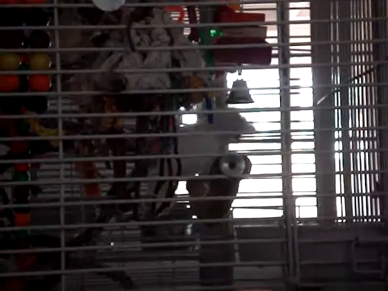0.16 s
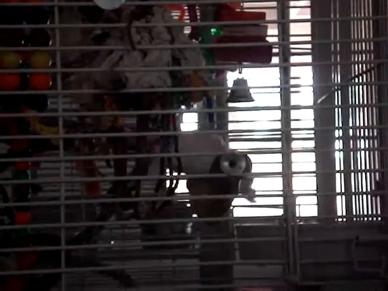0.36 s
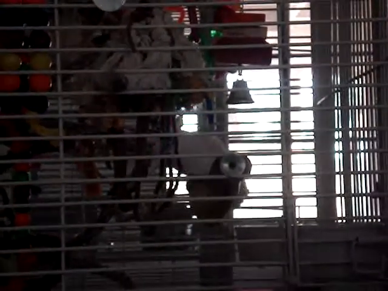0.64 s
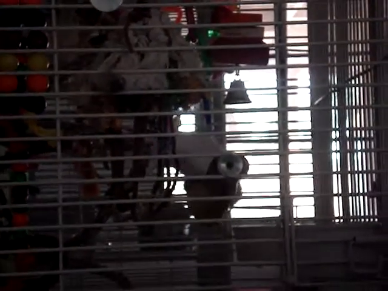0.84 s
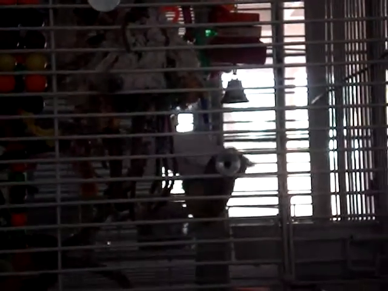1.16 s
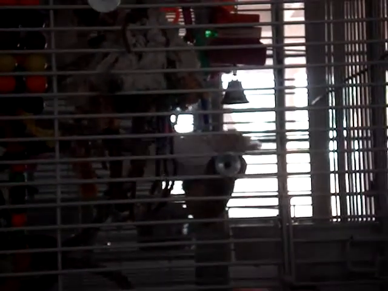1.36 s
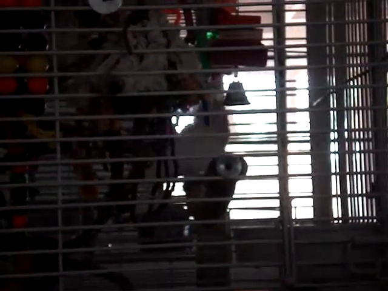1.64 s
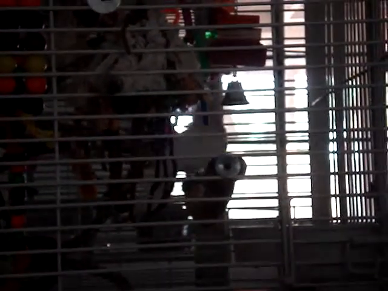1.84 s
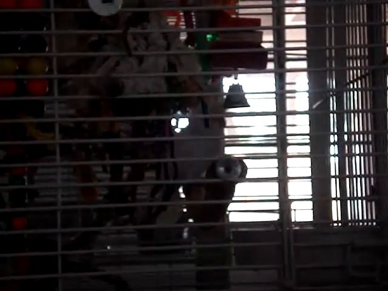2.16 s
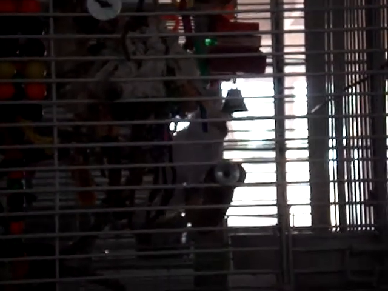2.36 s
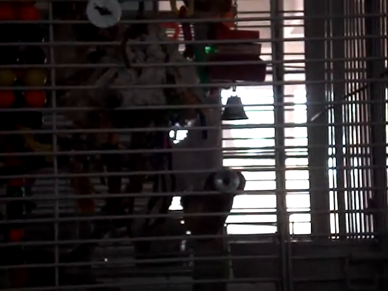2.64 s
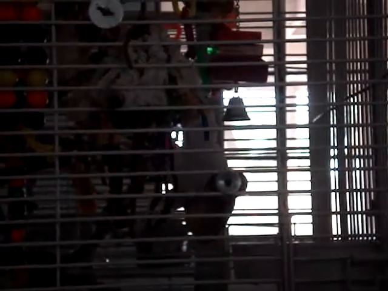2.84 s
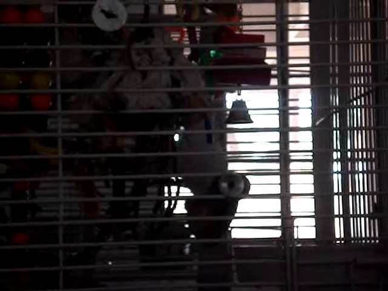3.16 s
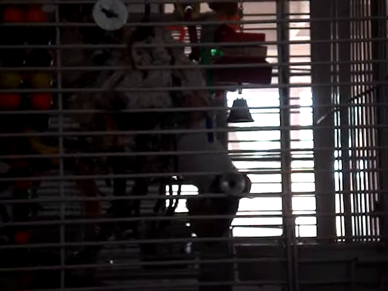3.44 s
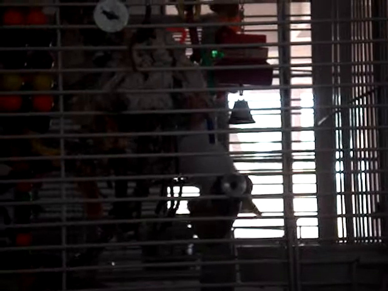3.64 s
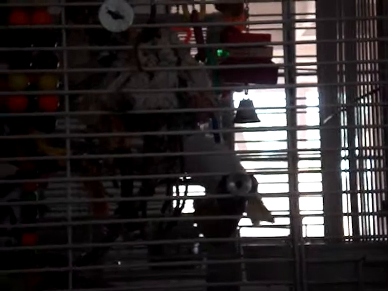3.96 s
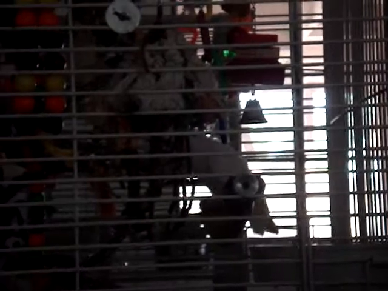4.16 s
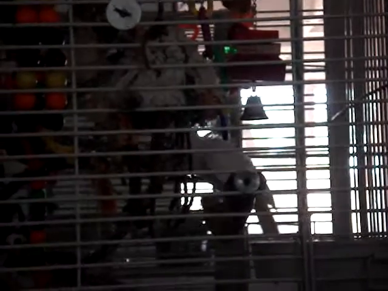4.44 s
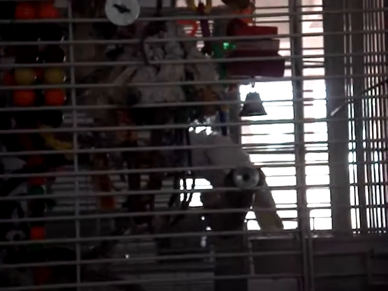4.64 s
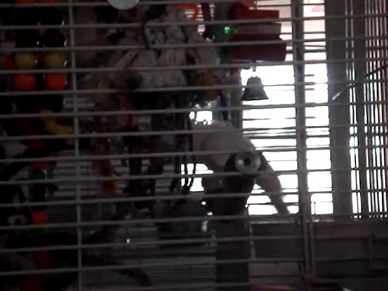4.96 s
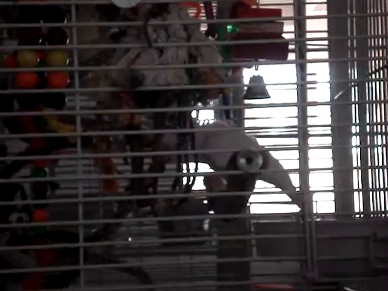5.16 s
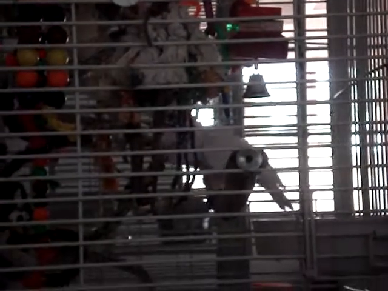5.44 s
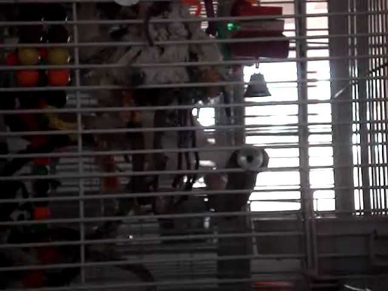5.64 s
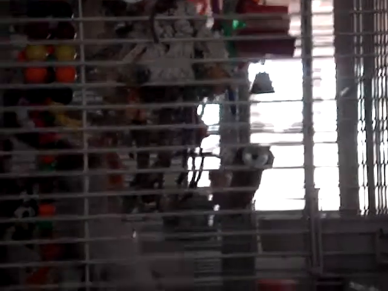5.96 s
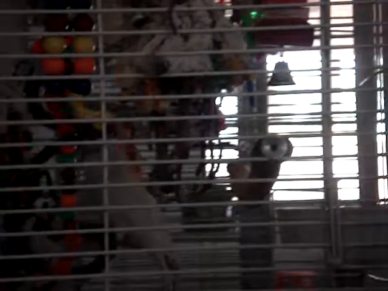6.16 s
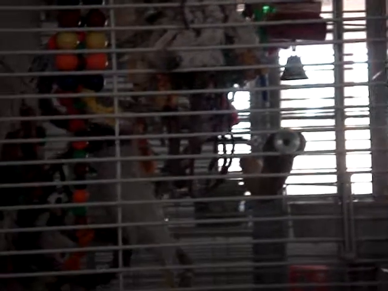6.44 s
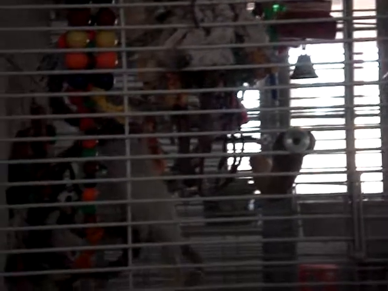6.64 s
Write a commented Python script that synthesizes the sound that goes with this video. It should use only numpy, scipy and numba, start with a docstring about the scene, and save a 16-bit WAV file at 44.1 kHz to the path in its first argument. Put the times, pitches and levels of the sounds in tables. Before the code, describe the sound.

Rasping parrot squawks run into piercing screeches, spaced apart, with a brief feather rustle on cage bars and a steady fan behind.

```python
"""Cockatoo squawking in its cage

Four harsh bouts ring through a hard-walled room: the syrinx flaps in rasping syllables, then pulls
tight into a piercing screech, both shaped by windpipe and beak. Before the last bout the bird moves,
feathers brush the bars and the wires ring faintly. A fan hums behind; a limiter ducks it at loud calls."""
import sys
import numpy as np
from scipy import signal
from scipy.fft import rfft, irfft
from scipy.io import wavfile
from scipy.ndimage import uniform_filter1d
from numba import njit

SR = 44100
rng = np.random.default_rng(int(sys.argv[2]) if len(sys.argv) > 2 else 0)


def unload_audio(sound):
    """Save the sound as a 16-bit wav file, at the path given as the first command line argument."""
    columns = np.transpose(np.atleast_2d(sound))
    # keep every value between -1 and 1, then stretch to whole-number steps
    steps = np.round(np.clip(columns, -1, 1) * 32767)
    wavfile.write(sys.argv[1], SR, steps.astype(np.int16))


N = 300310
TIME = np.arange(N) / SR
FREQS = np.fft.rfftfreq(N, 1 / SR)


def gain_of(db):
    """Decibels to a factor."""
    return 10 ** (np.asarray(db) / 20)


def unit_rms(x):
    """Scales to rms 1."""
    return x / np.sqrt(np.mean(x ** 2) + 1e-20)


def steadied(x):
    """Holds the short-time level at rms 1."""
    return x / np.sqrt(abs(uniform_filter1d(x ** 2, size=1000)) + 1e-12)


def curve_at(points, hz):
    """Reads a table on a log-frequency axis."""
    point_hz, value = np.transpose(points)
    return np.interp(np.log(hz + 1), np.log(point_hz + 1), value)


def noise(colour):
    """Steady noise of a given colour, rms 1."""
    return unit_rms(irfft(rfft(rng.standard_normal(N)) * gain_of(curve_at(colour, FREQS)), N))


def wander(rate_hz):
    """Smooth random modulation up to a rate, rms 1."""
    return unit_rms(irfft(rfft(rng.standard_normal(N)) / (1 + (FREQS / rate_hz) ** 4), N))


def sine(hz):
    """A sine of peak 1 that follows a pitch curve."""
    return np.sin(2 * np.pi * np.cumsum(hz) / SR)


def cut(x, hz, kind, order):
    """High-pass or low-pass."""
    return signal.sosfilt(signal.butter(order, hz, kind, fs=SR, output="sos"), x)


@njit
def resonate(x, hz, width_hz):
    """A moving resonance of gain 1."""
    pole = np.exp(np.pi * (2j * hz - width_hz) / SR)
    feed = 1 - np.exp(-np.pi * width_hz / SR)
    out, state = np.zeros(len(x)), 0j
    for i in range(len(x)):
        state = pole[i] * state + feed[i] * x[i]
        out[i] = 2 * state.real
    return out


# colour of the fan's rush and the room air: (frequency [Hz], relative density [dB])
AIR_COLOUR = [(15, -46.5), (25, -11), (81, -21.5), (124, -14.5), (172, -16.5), (226, -9), (283, -12),
              (492, -3), (601, -6), (681, -3), (1150, -9), (2210, -13), (2830, -18), (7720, -29.5),
              (9910, -34), (12900, -65), (21800, -120)]
# the fan's hum: (frequency [Hz], level [dB])
FAN_HUM = [(120, -64), (145, -68.5), (226.5, -60.5), (327, -70.5), (375, -61.5), (487, -56), (686, -49.5)]


def fan(air_db=-41.5, waver_db=.5, drift=.002):
    """The background bed: rushing air with a few slightly wavering tones."""
    hum = sum(gain_of(db + waver_db * wander(3.8)) * sine(hz * (1 + drift * wander(6)))
              for hz, db in FAN_HUM)
    return cut(gain_of(air_db) * noise(AIR_COLOUR) + np.sqrt(2) * hum, 37, "high", order=2)


def rasp(flap_hz=240, jitter=.35, puff_turns=.6, leak=.72, flutter_db=1.54):
    """The syrinx flaps unevenly and lets through a puff of turbulent air each time."""
    turns = np.cumsum(flap_hz * np.exp(jitter * wander(150))) / SR
    opening = leak + np.exp(-(turns % 1) / puff_turns)
    return unit_rms(opening * gain_of(flutter_db * wander(120)) * rng.standard_normal(N))


# short rasps; "beak" is the first resonance, which rises as the beak opens:
# (start [s], end [s], start effort [dB], end effort [dB], start beak [Hz], end beak [Hz], squeeze [0-1],
# slackness [around 1], brightness [dB], third resonance [Hz], fourth resonance [Hz])
SYLLABLES = [(0, .07, -13.5, -25.5, 1430, 1440, 0.02, 1.02, -2, 3580, 5900),
             (.13, 0.226, -34.5, -25, 1680, 1700, 0.03, 0.82, 3, 3820, 5970),
             (.255, 0.33, -21.5, -16.5, 1651, 1601, .2, 1.15, 0, 4350, 6500),
             (0.362, 0.42, -29.5, -25, 1420, 1450, 0.23, 0.94, -9, 3350, 6400),
             (.44, 0.493, -13, -18.5, 1480, 1440, 0, 0.92, 0.5, 3500, 5680),
             (.51, .56, -23.5, -24, 1460, 1450, 0.06, 0.75, -4, 3380, 5600),
             (.592, 0.701, -13.5, -8.5, 1625, 1620, .12, 0.97, 1.5, 3970, 6350),
             (.73, .77, -21.5, -18.5, 1530, 1520, .2, .86, 8, 3640, 5870),
             (2.195, 2.244, -25.5, -15, 1219, 1387, .22, 0.92, 0, 3669, 5630),
             (2.354, 2.425, -16, -14.5, 1544, 1600, 0.02, 0.93, 2, 4100, 6200),
             (3.859, 3.917, -31, -34.5, 1280, 1300, .1, 0.87, -4, 3970, 5900),
             (3.965, 4.084, -19, -16.5, 1453, 1690, 0, 1.03, 0.5, 4195, 6300),
             (6.502, 6.547, -33, -29, 1200, 1330, 0.15, .95, -3.5, 3370, 6430),
             (6.572, 6.681, -19, -15.5, 1383, 1480, 0.2, 0.9, -0.5, 3600, 5850),
             (6.749, 6.812, -19, -14.5, 1480, 1420, 0.4, 0.87, 0.5, 3750, 6000)]


def syllables(bite_db=2):
    """A two-point curve for each rasp: effort and beak glide, and the bright bite wears off."""
    return [[(start, start_db, start_hz, squeeze, slack, bright_db + bite_db, *upper_hz),
             (end, end_db, end_hz, squeeze, slack, bright_db - bite_db, *upper_hz)]
            for start, end, start_db, end_db, start_hz, end_hz, squeeze, slack, bright_db, *upper_hz
            in SYLLABLES]


def breath(call, attack_db_per_s=850.5, release_db_per_s=480):
    """Air pressure through one call: a quick attack, the effort, a release."""
    times, effort_db = np.transpose(call)[:2]
    attack_db = attack_db_per_s * np.maximum(times[0] - TIME, 0)
    release_db = release_db_per_s * np.maximum(TIME - times[-1], 0)
    return gain_of(np.interp(TIME, times, effort_db) - attack_db - release_db)


# five resonances of windpipe and beak: (base width [Hz], base level [dB], widening with slackness [power])
THROAT_MODES = [(221, -9, 0.14), (296.9, -0.5, 1.93), (670, -5, 1.884), (887, -7, 2.836), (1010, -15, 2.8)]


def throat(drive, mode_hz, squeeze, slack, bright_db, open_db=7.5, squeeze_db=-19.5, nasal_share=.63):
    """Windpipe and beak colour the voice: squeeze weakens the first resonance, slackness widens all."""
    nasal_db = nasal_share * bright_db
    lift_db = [open_db + squeeze_db * squeeze, 0, nasal_db, bright_db, bright_db]
    damping = [1, 1, gain_of(-.5 * nasal_db), 1, 1]  # the third narrows as it grows stronger
    voice = np.zeros(N)
    for k, (width_hz, db, power) in enumerate(THROAT_MODES):
        mode = resonate(drive, mode_hz[k], width_hz * damping[k] * slack ** power)
        voice += (-1) ** k * gain_of(db + lift_db[k]) * mode
    return cut(cut(voice, 950, "high", order=6), 2500, "low", order=2)


def screech(hz, jitter=.06, shake_hz=400, overtone_db=-14, half_db=-12):
    """Pulled tight, the syrinx whistles chaotically, with an overtone and a tone an octave below."""
    pitch = hz * (1 + jitter * wander(shake_hz))
    return unit_rms(sine(pitch) + gain_of(overtone_db) * sine(2 * pitch)
                    + gain_of(half_db) * sine(pitch / 2))


def throat_ring(hz, jitter=.035, shake_hz=200):
    """The narrow, slightly hoarse tone of a tight throat, rms 1."""
    return np.sqrt(2) * sine(hz * (1 + jitter * wander(shake_hz)))


# the long screeches that end the first three bouts, one curve each: (time [s], effort [dB], beak [Hz],
# squeeze [0-1], slackness [around 1], brightness [dB], third resonance [Hz], fourth resonance [Hz])
SCREECH_CURVES = [
    [(.8, -10.5, 1586, 1, 0.7, 4, 3855, 5450), (.92, -12, 1490, .9, 0.64, 0, 3770, 5387),
     (1.02, -10, 1570, .7, 0.77, 1, 3720, 5450), (1.1, -7, 1610, .64, 0.85, 2, 3700, 5780),
     (1.22, -5.5, 1629, .62, 1.04, 6, 4100, 5885), (1.377, -7, 1578, 0.58, 0.83, 2.5, 3830, 5760)],
    [(2.497, -14, 1585, 1, 0.74, -3.5, 3640, 5876), (2.54, -13, 1720, 0.98, 0.85, -1.5, 3600, 5800),
     (2.57, -9.5, 1780, 0.42, 1.43, 2, 3380, 5200), (2.63, -7.5, 1650, 0.06, 1.02, 3, 4300, 6580),
     (2.7, -9.5, 1610, 0.03, 1.5, 6, 4320, 6600), (2.73, -15.5, 1560, 0.07, 1.1, 4, 4300, 6500),
     (2.78, -8.5, 1516, 0.09, 1.13, 1.5, 4350, 6450), (2.84, -16, 1492, 0, 0.97, 5, 4350, 6450),
     (2.9, -34, 1444, 0, 0.75, 3, 4300, 6500)],
    [(4.178, -10.5, 1530, 1, 0.7, -0.5, 3915, 6200), (4.25, -10.5, 1620, 0.34, 1.61, 2.5, 3120, 5850),
     (4.34, -7.5, 1304, 1, 1.46, -2, 3234, 5950), (4.43, -8, 1400, 0.78, 1.75, 0.5, 2850, 5300),
     (4.49, -10, 1550, 0.25, .8, 4.5, 4160, 6300), (4.58, -6.5, 1446, 0.44, 1.04, 3, 4320, 6270),
     (4.75, -7.5, 1504, .18, 1.06, 2.5, 4120, 6200), (4.81, -17, 1490, .2, 1.23, 2.5, 3800, 6060),
     (4.905, -16.5, 1383, 0.31, 1.33, -7, 3500, 6100)],
]


def cockatoo(screech_db=-19, ring_db=-10.5, tremble=.012, tremble_hz=14, flicker_db=2,
             beak_rest_hz=1500, second_rest_hz=2434):
    """Rasp and screech pass the moving throat; squeezed tight, it rings on its second resonance."""
    calls = syllables() + SCREECH_CURVES
    times, _, *columns = np.transpose(sorted(tuple(point) for call in calls for point in call))
    beak_hz, squeeze, slack, bright_db, third_hz, fourth_hz = (np.interp(TIME, times, c) for c in columns)
    unrest = wander(tremble_hz)  # the throat never holds quite still
    beak_hz *= 1 + tremble * unrest
    bright_db += flicker_db * unrest
    second_hz = second_rest_hz * (beak_hz / beak_rest_hz) ** .7 * (1 + .15 * squeeze)
    mode_hz = [beak_hz, second_hz, third_hz, fourth_hz, 1.508 * fourth_hz]  # last: next windpipe mode
    tight = np.clip(np.minimum(squeeze - .33, 1.2 - slack) / .28, 0, 1)  # squeezed and not slack
    drive = rasp() + gain_of(screech_db) * tight * screech(second_hz)
    voice = steadied(throat(drive, mode_hz, squeeze, slack, bright_db))
    ring = gain_of(ring_db) * tight * throat_ring(second_hz)
    return steadied(voice + ring) * sum(breath(call) for call in calls)  # breath sets the level


# the syrinx ringing on one tone: (start [s], end [s], start pitch [Hz], end pitch [Hz], level [dB])
WHISTLE_GLIDES = [(2.428, 2.476, 3680, 3713, -24), (2.58, 2.721, 1800, 1535, -19),
                  (2.902, 3.013, 2324, 2280, -30.5), (3.893, 4.001, 2430, 2395, -27),
                  (4.069, 4.123, 2700, 2795, -25.5), (4.32, 4.46, 2710, 2800, -16),
                  (6.544, 6.702, 2407, 2520, -22), (6.556, 6.691, 3563, 3570, -26.5),
                  (6.568, 6.702, 1350, 1520, -27)]


def whistles(jitter=.026, shake_hz=200, fade_s=.0073):
    """Short hoarse tones from the syrinx, in and between the calls."""
    sound = np.zeros(N)
    shake = 1 + jitter * wander(shake_hz)
    for start, end, start_hz, end_hz, db in WHISTLE_GLIDES:
        hz = np.interp(TIME, [start, end], [start_hz, end_hz]) * shake
        envelope = np.clip(np.minimum(TIME - start, end - TIME) / fade_s, 0, 1)
        sound += gain_of(db) * envelope * sine(hz)
    return np.sqrt(2) * sound


# colour of the rustle: (frequency [Hz], relative density [dB])
FEATHER_COLOUR = [(500, -11), (1500, -1.5), (3000, 3.5), (4500, 1), (6000, -0.5), (10000, -9)]
# strokes along the bars: (peak time [s], level [dB], rise [dB/s], fade [dB/s])
FEATHER_STROKES = [(5.935, -40.5, 115, 77), (6.38, -55.5, 300, 200)]


def feathers(grain_db=4, grain_hz=80):
    """Feathers brush the cage in swells of grainy noise."""
    swells = sum(gain_of(db - np.maximum(rise * (peak - TIME), fade * (TIME - peak)))
                 for peak, db, rise, fade in FEATHER_STROKES)
    return swells * unit_rms(noise(FEATHER_COLOUR) * gain_of(grain_db * wander(grain_hz)))


# ring of the cage wires: (frequency [Hz], relative level [dB], t60 [s])
WIRE_MODES = [(3140, -6, .5), (4000, 2.5, 0.59), (5749, 0, 0.52), (6750, 6, 0.27), (8231, 3, 0.3),
              (8495, -1, 0.34), (9545, 4, 0.34)]
# light knocks as the bird moves: (time [s], level [dB])
WIRE_KNOCKS = [(5.93, -57), (6.05, -59), (6.135, -59)]


def cage_wires(buzz_depth_hz=35, buzz_rate_hz=58):
    """Light knocks set the loose wires ringing and buzzing."""
    sound = np.zeros(N)
    for hz, db, t60 in WIRE_MODES:
        decay = sum((TIME > start) * gain_of(knock_db + db - 60 * abs(TIME - start) / t60)
                    for start, knock_db in WIRE_KNOCKS)
        sound += decay * sine(hz + buzz_depth_hz * wander(buzz_rate_hz))
    return sound


# reverb of the hard walls: (frequency [Hz], t60 [s])
ROOM_DECAY = [(300, 1), (1200, 0.55), (2200, 0.58), (4000, 0.47), (9000, 0.43)]


def room(x, direct_db=-2.5, wet_db=-1.5, sets=7, handovers_per_s=10, density=.1, predelay_s=.003):
    """Direct sound plus dense wall reflections, which keep changing as the bird swings its head."""
    wet = np.zeros(N)
    for k in range(sets):
        taps = rng.standard_normal(SR) * (rng.random(SR) < density) * (TIME[:SR] > predelay_s)
        hz, age, spectra = signal.stft(taps, SR, nperseg=256)
        decay = gain_of(-60 * age / curve_at(ROOM_DECAY, hz)[:, None])
        tail = signal.istft(spectra * decay, SR, nperseg=256)[1]
        turn = (handovers_per_s * TIME - k) % sets  # each set of reflections crossfades into the next
        facing = np.sin(np.pi / 2 * turn) * (turn < 2)
        wet += signal.fftconvolve(x * facing, tail / np.linalg.norm(tail))[:N]
    return gain_of(direct_db) * x + gain_of(wet_db) * wet


def scene():
    """Bird and cage in the room, over the fan, in mono."""
    return (room(cockatoo() + whistles() + feathers() + cage_wires()) + fan())[None]


def record(dry, limit_db=-15, recover_db_per_s=7.5, start_duck_db=7, offset=.062, ceiling=.56,
           top_hz=10030):
    """A limiter that ducks at once and recovers slowly, then soft clipping and a steep low-pass."""
    over_db = 10 * np.log10(abs(uniform_filter1d(dry[0] ** 2, size=300)) + 1e-12) - limit_db
    over_db[0] = start_duck_db  # still ducked by an earlier squawk
    recovery_db = recover_db_per_s * TIME
    duck_db = np.maximum(np.maximum.accumulate(over_db + recovery_db) - recovery_db, 0)
    gain = gain_of(-uniform_filter1d(duck_db, size=120))
    thumps = cut(offset * (gain - gain[0]), 30, "high", order=2)  # each duck jolts the input's DC offset
    limited = gain * dry[0] + thumps
    rounded = limited / (1 + (limited / ceiling) ** 10) ** (1 / 10)
    low_pass = signal.firwin(1023, top_hz, window=("kaiser", 9), fs=SR)
    return signal.oaconvolve(rounded, low_pass, "same")[None]


dry = scene()
out = record(dry)
unload_audio(out)
```